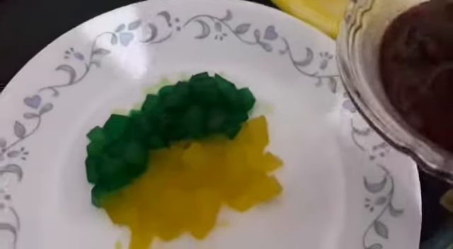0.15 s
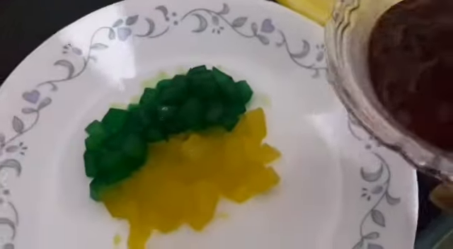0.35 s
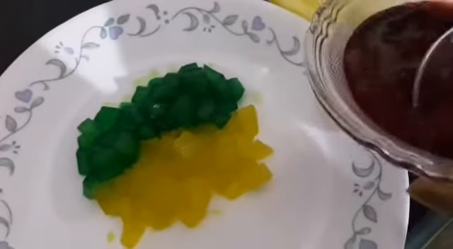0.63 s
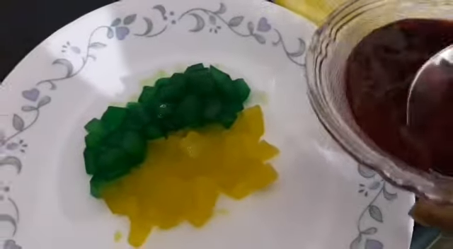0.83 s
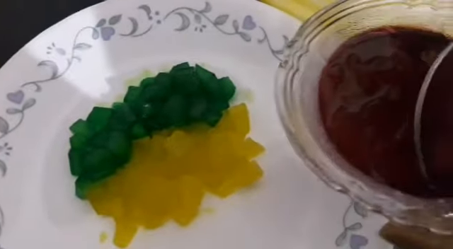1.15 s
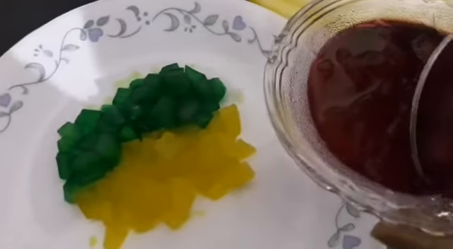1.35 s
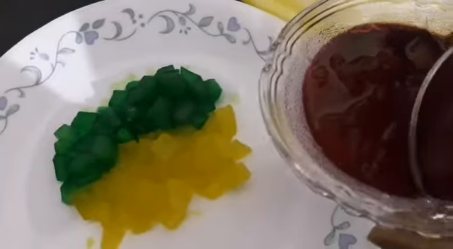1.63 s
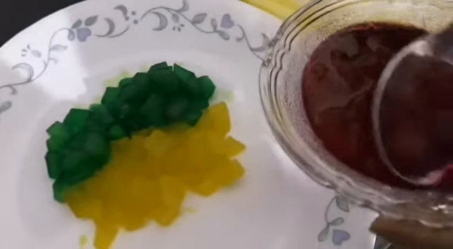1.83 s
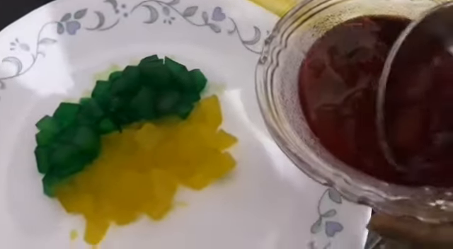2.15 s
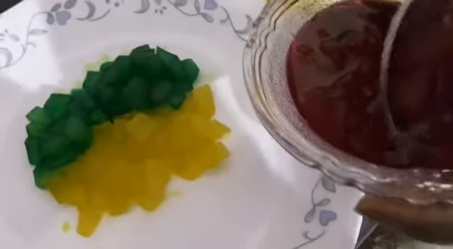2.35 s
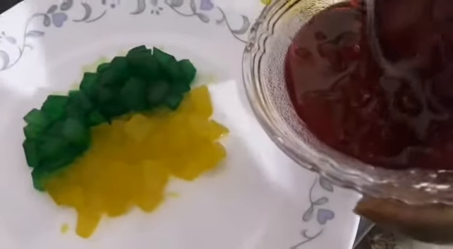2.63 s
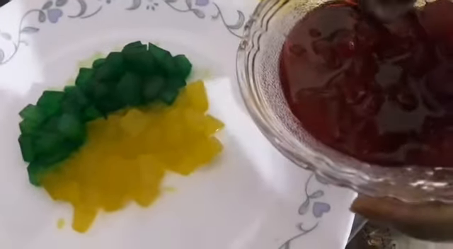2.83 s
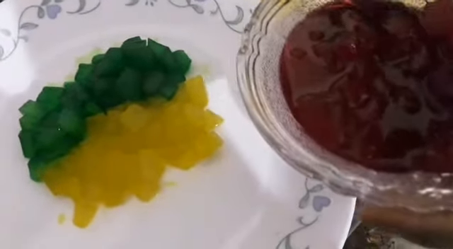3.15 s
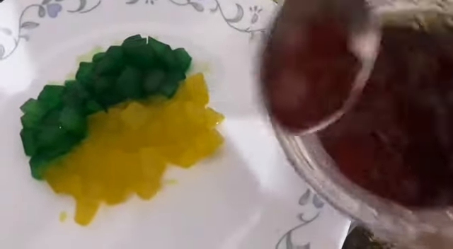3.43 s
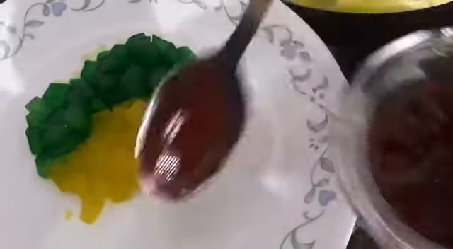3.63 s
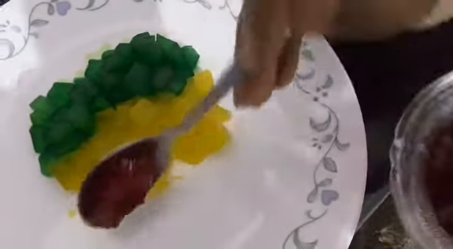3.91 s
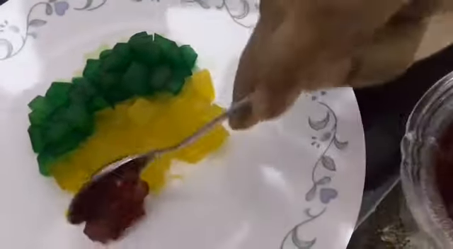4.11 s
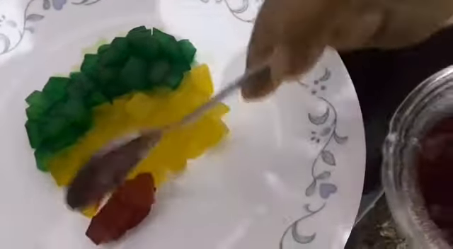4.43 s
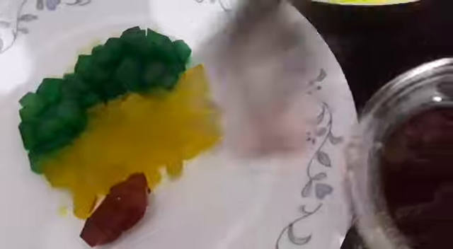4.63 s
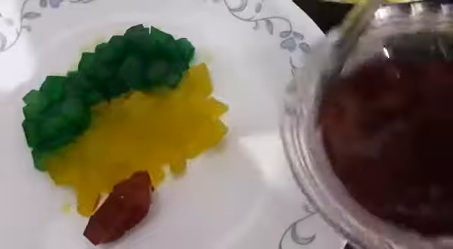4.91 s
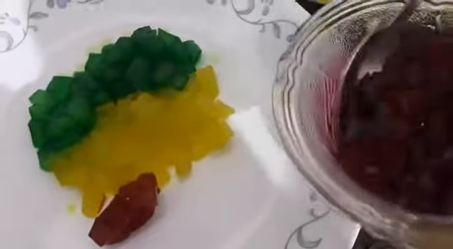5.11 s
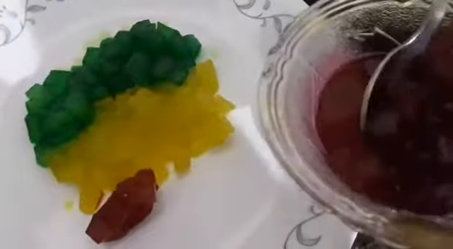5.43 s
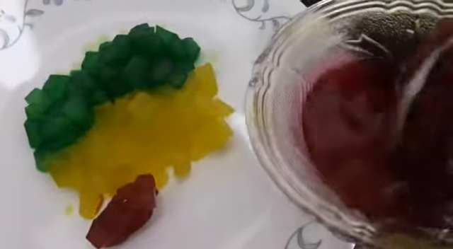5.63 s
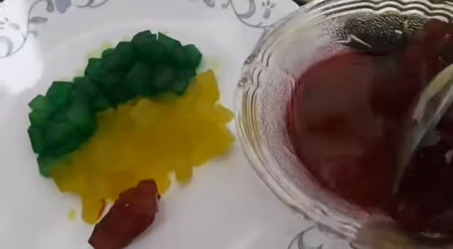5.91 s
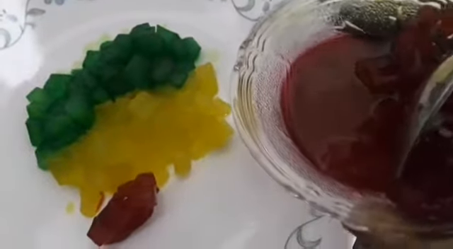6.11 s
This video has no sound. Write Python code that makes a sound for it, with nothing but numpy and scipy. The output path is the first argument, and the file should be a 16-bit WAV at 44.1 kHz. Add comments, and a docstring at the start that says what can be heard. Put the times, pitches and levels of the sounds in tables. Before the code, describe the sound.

Six short glassy spoon clinks and one tiny scrape on a syrup-filled bowl, close up, with a quiet room hum and faint hiss.

```python
"""Spoon on a bowl of syrup

A steel spoon clinks six times against a thick glass bowl of syrup, close to a phone in a kitchen, and slides once.
Each clink is a set of damped rings plus a dry tick; syrup and fingers stop the ring within a few hundredths
of a second. The hard-walled room carries it on through sparse echoes.
Shaped noise makes the dull drone of the house and the hiss of the one microphone underneath."""
import sys
import numpy as np
from scipy import signal
from scipy.fft import rfft, irfft
from scipy.io import wavfile
from scipy.ndimage import uniform_filter1d

SR = 44100
rng = np.random.default_rng(int(sys.argv[2]) if len(sys.argv) > 2 else 0)


def boost(x):
    """Linear amplitude factor 10**(x/20) for a level x in decibels (scalar or array-like)."""
    u = np.asarray(x, float) / 20
    return 10 ** u


def master(y):
    """Save y as 16-bit WAV."""
    cut = np.clip(np.atleast_2d(y).T, -1, 1)
    pcm = np.round(cut * 32767)  # scale
    wavfile.write(sys.argv[1], SR, pcm.astype(np.int16))


N = 276198  # length in samples

# typical pitch of the six families of rings, low to high: [Hz]
FAMILY_HZ = 1600, 2200, 3100, 4200, 5250, 9000
# colour of the dry click of steel on glass, before the family levels: pitch_hz [Hz], level_db [dB per Hz]
TICK_COLOUR = [(250, -18), (600, -8), (1500, -0.5), (3000, 2), (5000, -1), (6000, -8.5), (7500, -4),
               (9000, -7), (15500, -17.5)]


def evened(x):
    """Scales a signal to an rms (average strength) of 1."""
    return x / np.sqrt(np.mean(x ** 2) + 1e-20)


def read(points, hz, axis=1):
    """Reads one column of a table between its points, on a log-frequency axis."""
    table = np.transpose(points)
    return np.interp(np.log(hz + 1), np.log(table[0] + 1), table[axis])


def noise(shape_db, patchy_db):
    """Random short-time spectra of a given shape, with drifting patches; rms 1."""
    real, imaginary, patches = rng.standard_normal((N // 512 + 5, 1025, 3)).T
    patches = uniform_filter1d(patches, size=16, axis=0)  # smooth over pitch
    patches = evened(uniform_filter1d(patches, size=8, axis=1))  # smooth over time
    spectra = (real + 1j * imaginary) * boost(shape_db[:, None] + patchy_db * patches)
    return evened(signal.istft(spectra, nperseg=2048, noverlap=1536)[1][:N])


def drone():
    """House drone: low noise with room resonances, a little louder at first, then steady."""
    # colour before the humps: pitch_hz [Hz], level_db [relative dB per Hz]
    colour = [(15, -60.5), (28, -33), (46, -15), (65, -14.5), (238, -4), (282, -7), (326, 3), (378, -10.5),
              (416, -4.5), (628, -11.5), (882, -11.5), (2160, -14.5), (3500, -32), (4500, -36.5),
              (5300, -49), (8200, -46), (9500, -100)]
    # room resonances on top of it: pitch_hz [Hz], width_hz [Hz], level_db [dB]
    humps = [(51, 5.88, 14.5), (80, 13.5, 8.5), (146, 15, 2.5), (199, 16, 3), (263.5, 25.2, 5.5),
             (541.6, 41, 2.5), (850, 220, 4), (2129, 740, 1.5)]
    level_db, start_db, settle_s = -53.5, 3.5, 0.2515
    hz, t = np.fft.rfftfreq(2048, 1 / SR), np.arange(N) / SR
    humps_db = sum(db / (1 + (2 * (hz - pitch_hz) / width_hz) ** 2) for pitch_hz, width_hz, db in humps)
    steady = noise(read(colour, hz) + humps_db, patchy_db=0.87)
    return steady * boost(level_db + start_db * np.exp(-t / settle_s))


def hiss():
    """Microphone hiss: noise mostly in the top octave, its level rising and falling slowly."""
    # colour: pitch_hz [Hz], level_db [relative dB per Hz]
    colour = [(4470, -74.5), (7600, -1), (8380, -7), (9670, -3), (15100, -2.5), (15800, -10.5), (16200, -9)]
    # overall level over time: start_s [s], level_db [dB]
    levels = [(0.0, -69), (0.35, -67.5), (0.95, -64.5), (1.15, -64.5), (1.43, -69), (5.55, -69),
              (5.85, -65.5), (6.26, -65.5)]
    t = np.arange(N) / SR
    level_db = np.interp(t, *np.transpose(levels))
    return noise(read(colour, np.fft.rfftfreq(2048, 1 / SR)), patchy_db=0.7) * boost(level_db)


def channel_noise():
    """Faint noise added to one channel and taken from the other, so the two are not quite alike."""
    # colour: pitch_hz [Hz], level_db [relative dB per Hz]
    colour = [(15, -55), (25, -36), (111, -8.5), (365, -7), (2240, -8.5), (4300, -16), (5950, -24.5),
              (7590, -18), (8690, -10.5), (14900, -11.5), (16200, -23.5)]
    apart = boost(-72.5) * noise(read(colour, np.fft.rfftfreq(2048, 1 / SR)), patchy_db=1.0)
    return np.array([apart, -apart])


def rings(t, drive_db, lasting, upper_hz):
    """Spoon and bowl in contact: dying sine waves, beamed at the microphone, so the room hears less of them."""
    # before drive and length factor: pitch_hz [Hz], level_db [dB], t60_s [s to fall by 60 dB]
    ring_table = [(423, -15, 0.015), (598, -10, 0.01975), (884, -12.5, 0.0197), (996, -7.5, 0.04046),
                  (1406, 4, 0.018), (1694, 0, 0.025), (2050, -9, 0.034), (2137, -0.5, 0.047),
                  (2196, -4, 0.046), (2304, 3.5, 0.054), (2630, -15, .02), (2742, 2, 0.028),
                  (3036, -4, 0.019), (3251, -2.5, 0.056), (3236, -14.5, 0.022), (3570, -6.5, 0.019),
                  (3714, -1.5, 0.03), (3920, 0.5, 0.009), (4150, 1.5, 0.0255), (4200, 2, 0.014),
                  (4640, -12, 0.017), (5177, -6.5, 0.0215), (5226, -1.5, 0.04), (5495, -13.5, 0.018),
                  (6530, -20.5, 0.031), (9050, -1, 0.031), (11090, -3, 0.027), (11730, -2.5, 0.032),
                  (12660, -7, .012), (14120, -3, 0.02), (14380, -3.5, 0.0152)]
    # borders between the six families: [Hz]
    family_edges = 1900, 2280, 3800, 4900, 7500
    # what each family sends to the room, against the near sound: [dB]
    room_share = -9, -5.5, -1, -9.5, -4.5, -1.5
    hz, db, t60_s = np.transpose(ring_table)[:, :, None]
    family = np.searchsorted(family_edges, hz)
    hz = np.where(family == 3, hz * upper_hz / 4190, hz)  # only the upper middle rings move
    level_db = db + drive_db[family] - 60 * t / (lasting * t60_s)
    modes = boost(level_db) * np.sin(2 * np.pi * hz * t)
    far_modes = modes * boost(np.array(room_share)[family])
    return modes.sum(0), far_modes.sum(0)


def tick(t, drive_db):
    """Dry tick of steel on glass: coloured noise that dies away within milliseconds."""
    bins = np.fft.rfftfreq(len(t), 1 / SR)
    colour_db = read(TICK_COLOUR, bins) + read(np.transpose([FAMILY_HZ, drive_db]), bins)
    coloured = irfft(rfft(rng.standard_normal(len(t))) * boost(colour_db), len(t))
    return coloured * boost(7) * np.exp(-t / 0.002)


def far_click(t, drive_db):
    """The plain click the room gets: one pulse, with the families more evenly driven."""
    click_level_db, contrast = 24, 0.68
    bins = np.fft.rfftfreq(len(t), 1 / SR)
    even_db = drive_db.max() + contrast * (drive_db - drive_db.max())
    click_db = click_level_db + read(TICK_COLOUR, bins) + read(np.transpose([FAMILY_HZ, even_db]), bins)
    return np.roll(irfft(boost(click_db), len(t)), SR // 500)  # pulse centred at 2 ms


def near_echoes(t, direct):
    """Adds the early reflections from counter, plate and near wall: delayed, weaker copies."""
    # delay_s [s], level_db [dB]
    reflections = [(.0013, -18.5), (.0051, -16.5), (.0098, -14.5)]
    out = direct.copy()
    for delay_s, level_db in reflections:
        out += boost(level_db) * np.interp(t - delay_s, t, direct, left=0)
    return out


def clink(ring_db, drive_db, lasting, upper_hz=4190):
    """Damped rings and a tick, each family driven by its own dB; gives the near sound and what the room gets."""
    t = np.arange(SR // 5) / SR
    near_rings, far_rings = rings(t, drive_db, lasting, upper_hz)
    blow = boost(ring_db) * (1 - np.exp(-t / 0.00052))  # contact builds up in about a millisecond
    near = near_echoes(t, blow * (near_rings + tick(t, drive_db)))
    return np.array([near, blow * (far_rings + far_click(t, drive_db))])


def struck(ring_db, lower_db, upper_db, treble_db, upper_hz):
    """Where the spoon lands decides how hard each family of rings is driven."""
    # low knock: base_db [dB], per_upper [dB per dB of upper middle], per_treble [dB per dB of treble]
    knock_rule = (6.5, .15, .86)
    # second ring: base_db [dB], per_lower [dB per dB of lower middle], per_treble [dB per dB of treble]
    second_rule = (5.8, .6, -0.22)
    knock_db = np.dot(knock_rule, [1, upper_db, treble_db])
    second_db = np.dot(second_rule, [1, lower_db, treble_db])
    drive_db = np.array([knock_db, 0, lower_db, upper_db, second_db, treble_db])
    return clink(ring_db, drive_db, lasting=0.82, upper_hz=upper_hz)


def kitchen(x):
    """Room echo: sparse taps of random sign, one in every 20 samples, each band dying at its own speed."""
    # pitch_hz [Hz], t60_s [s to fall by 60 dB], level_db [dB before the overall level]
    bands = [(500, 0.42, 0), (1415, 0.41, 1), (2207, 0.511, -1), (3104, 0.58, 1), (4275, 0.647, -5),
             (5400, 0.57, -2.5), (6240, 0.42, -3), (8950, 0.55, -3.5), (15000, 0.45, -4.5)]
    taps = np.zeros(SR)
    slots = np.arange(0, SR - 20, 20)
    taps[slots + rng.integers(0, 20, len(slots))] = rng.choice([-1., 1.], len(slots))
    taps *= np.clip((np.arange(SR) / SR - .006) / 0.017, 0, 1)  # the walls answer after a few milliseconds
    hz, t, spectra = signal.stft(taps, SR, nperseg=256)
    fade_db = -60 * t / read(bands, hz)[:, None]
    tail = signal.istft(spectra * boost(fade_db), SR, nperseg=256)[1]
    colour_db = read(bands, np.fft.rfftfreq(len(tail), 1 / SR), axis=2)
    tail = irfft(rfft(tail / np.linalg.norm(tail)) * boost(colour_db), len(tail))
    return boost(-6.5) * signal.fftconvolve(x, tail)


def slide(length_s, slide_db):
    """The spoon slides along the glass: tiny stick-slip ticks, each exciting the damped rings."""
    # how hard each family is driven, low to high: [dB]
    slide_drive = (-14, -6, -7, 0, 4, 0.5)
    count = round(length_s * SR)
    chance, size = rng.random((count, 2)).T
    happens = chance < 2500 / SR  # about 2500 slips a second, at random moments
    slips = happens * np.sign(size - .5) * boost(-14.0 * size) * np.hanning(count)
    ring = clink(slide_db, np.array(slide_drive), lasting=0.26)
    return signal.fftconvolve(slips[None], ring, axes=1)


def scene():
    """Every clink sounds from a slightly new place, so each meets its own set of echoes."""
    # start_s [s], ring_db [dB], then lower_db, upper_db, treble_db [dB against it: lower middle, upper
    # middle and treble rings], upper_hz [Hz, centre of the upper middle rings, moved by grip and syrup]
    clinks = [(0.2156, -16.5, -6, -3.5, -14, 4200), (0.7688, -20.5, -14.5, -3.5, -19.5, 4230),
              (1.673, -21.5, -17, -13, -21.5, 4230), (5.0221, -18.5, -27.5, -32, -18.5, 4200),
              (5.1530, -34, -4, 13, 2.5, 4330), (5.345, -29.5, -15, -3.5, -16, 4070)]
    # start_s [s], length_s [s], level_db [dB]
    slides = [(5.036, 0.086, -55)]
    mix = np.zeros(N + 2 * SR)
    sounds = [(start_s, struck(*blow)) for start_s, *blow in clinks]
    sounds += [(start_s, slide(*stroke)) for start_s, *stroke in slides]
    for start_s, (near, far) in sounds:
        at, wet = round(start_s * SR), kitchen(far)
        mix[at:at + len(near)] += near
        mix[at:at + len(wet)] += wet
    return np.tile(mix[:N] + drone() + hiss(), (2, 1))


def treble_limits(sound):
    """Leaves a hole in the treble around 6.5-8.2 kHz and next to nothing above 15800 Hz."""
    # the hole: pitch_hz [Hz], level_db [dB]
    hole = [(5900, 0), (6700, -6.5), (7200, -20), (7800, -23), (8200, -7), (8500, -1)]
    hz = np.linspace(0, SR / 2, 1025)
    gain = boost(read(hole, hz)) * (hz < 15800)
    response = signal.firwin2(511, hz, gain, window=("kaiser", 9), fs=SR)
    return signal.oaconvolve(sound, response[None], "same")


def top_cut(x):
    """Nothing passes above the cut-off."""
    return signal.sosfilt(signal.butter(12, 16440, fs=SR, output="sos"), x)


def record(dry):
    """One microphone feeds both channels, which differ only by a trace of noise."""
    heard = treble_limits(dry + channel_noise())
    return top_cut(heard)


dry = scene()
out = record(dry)
master(out)
```